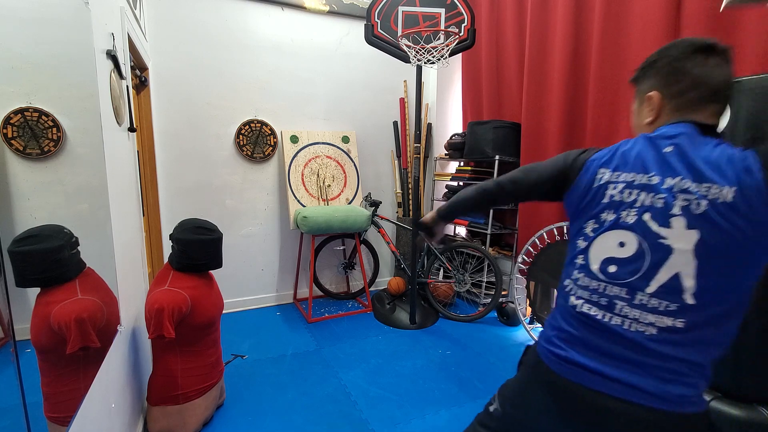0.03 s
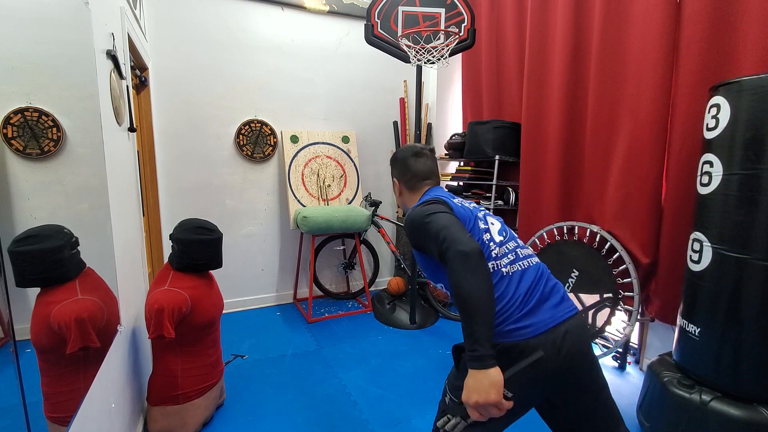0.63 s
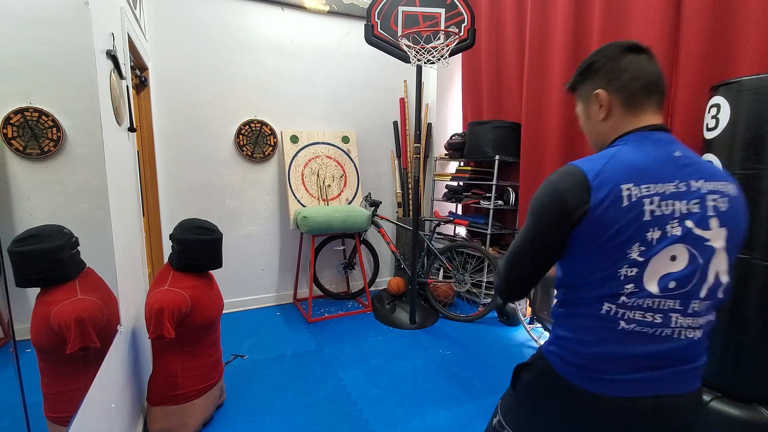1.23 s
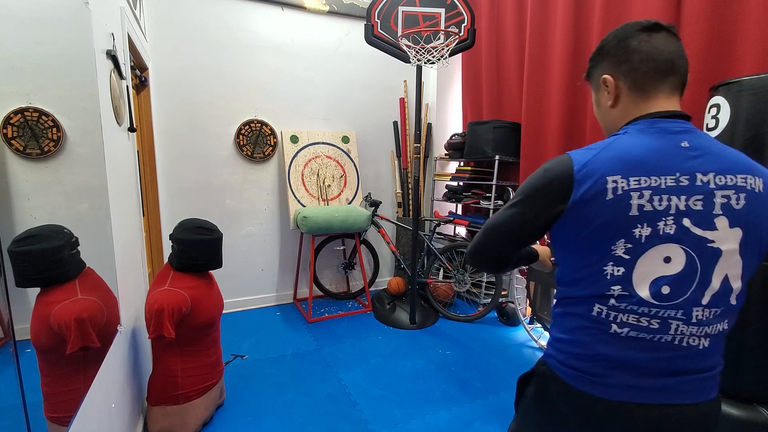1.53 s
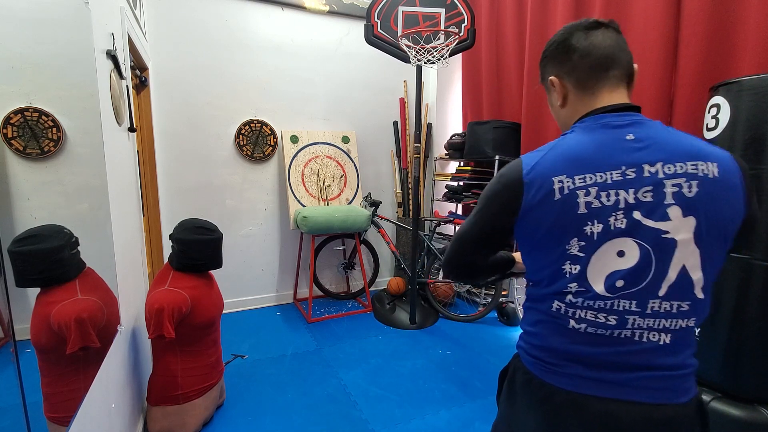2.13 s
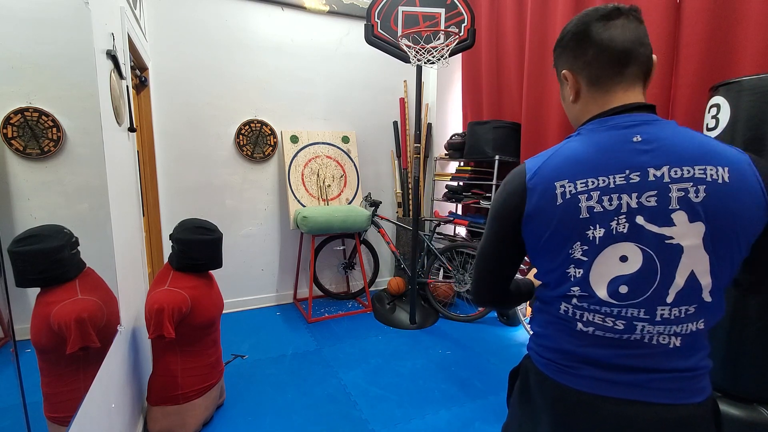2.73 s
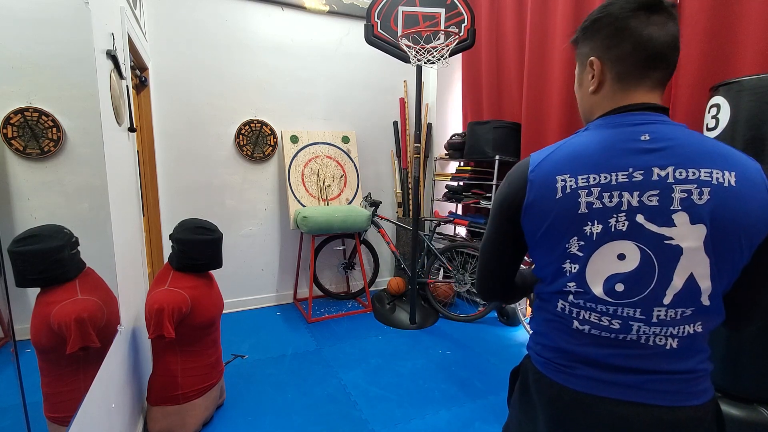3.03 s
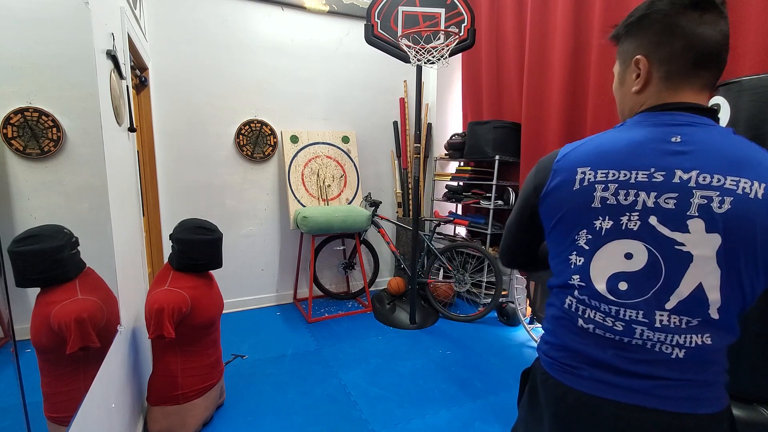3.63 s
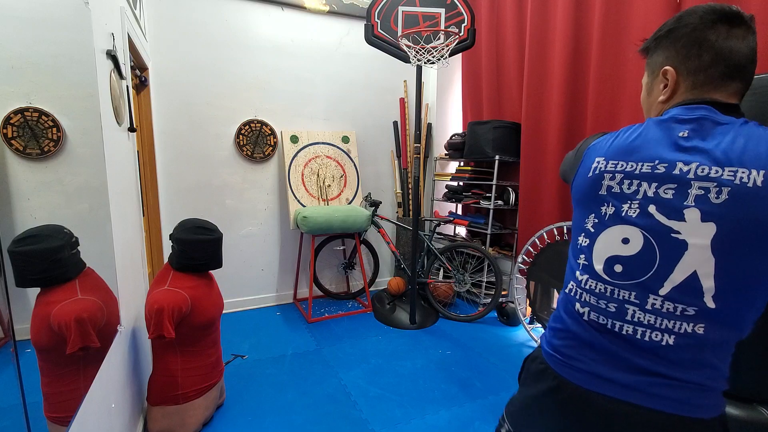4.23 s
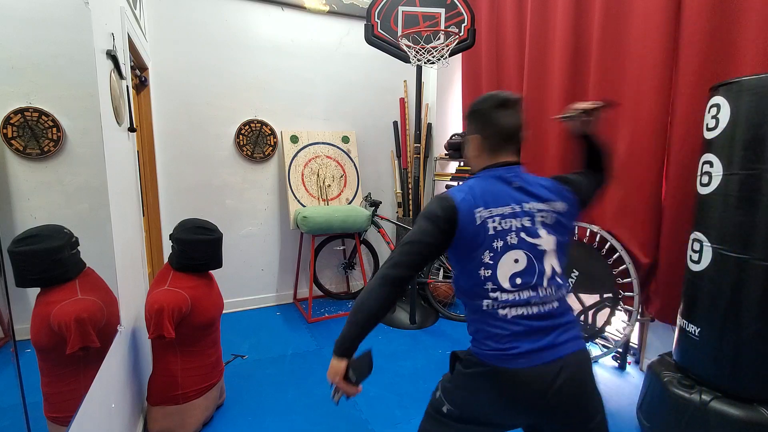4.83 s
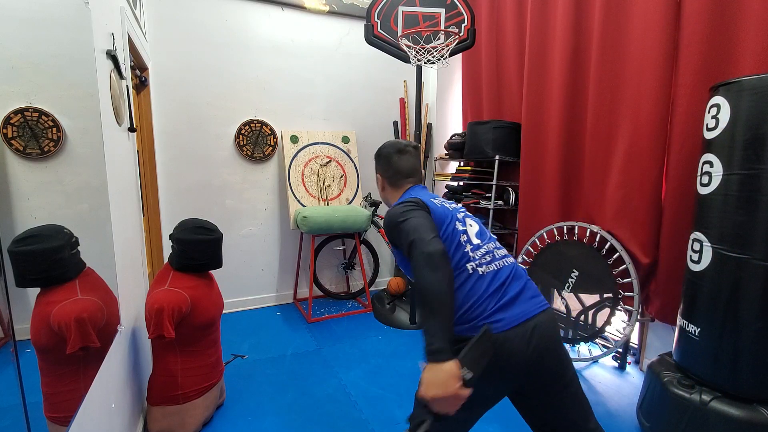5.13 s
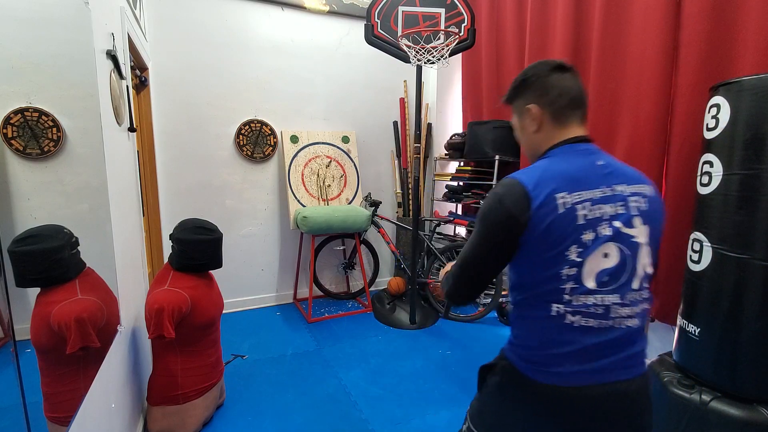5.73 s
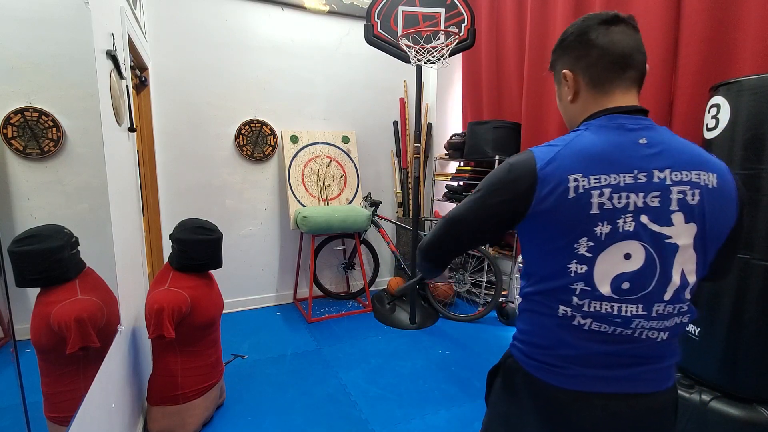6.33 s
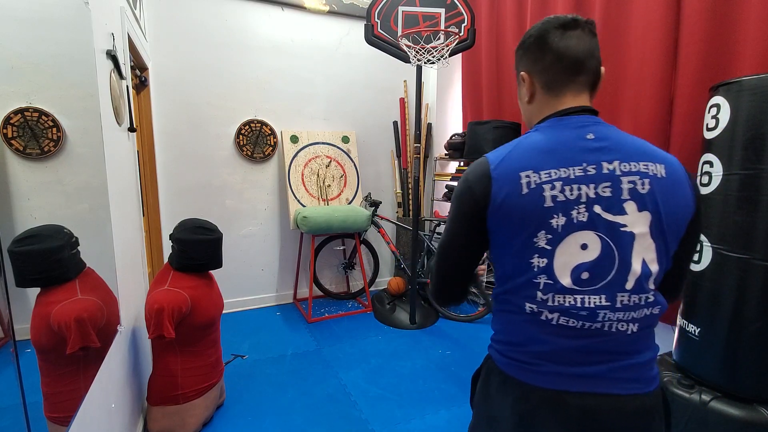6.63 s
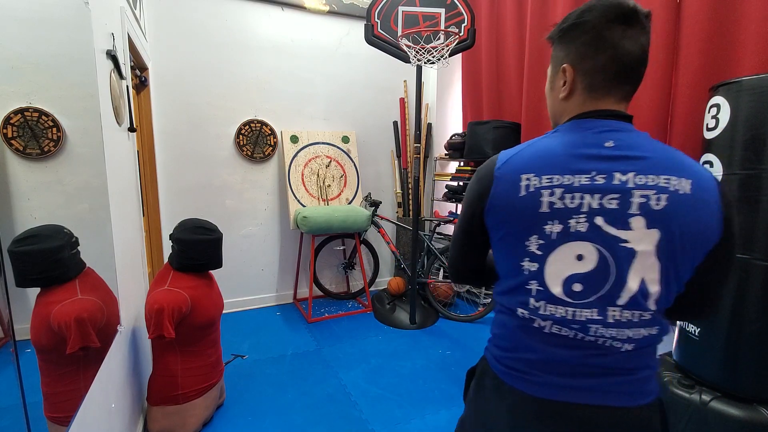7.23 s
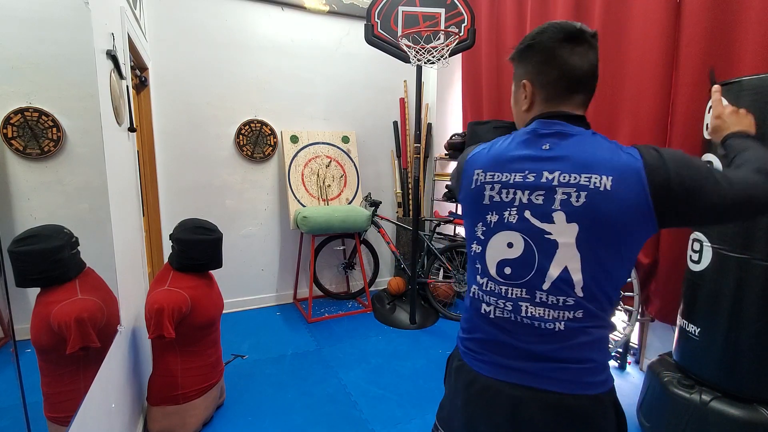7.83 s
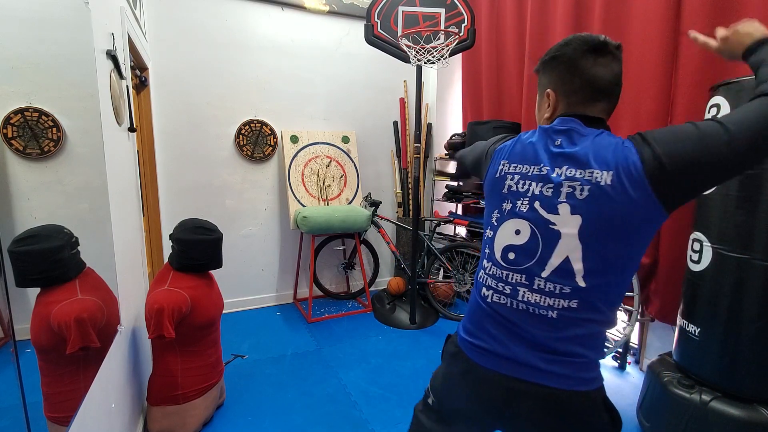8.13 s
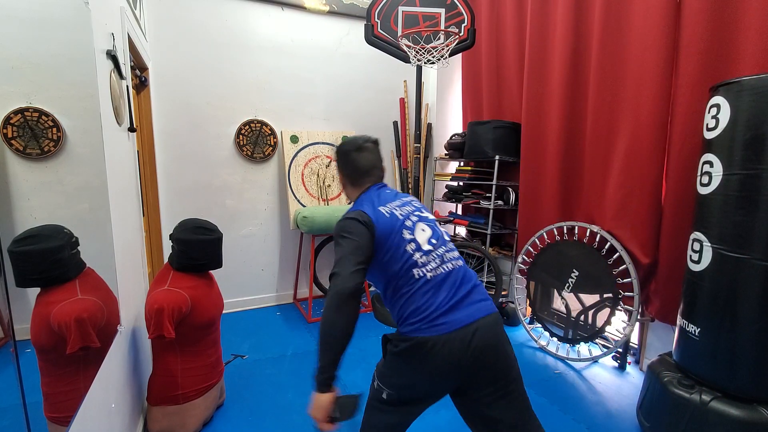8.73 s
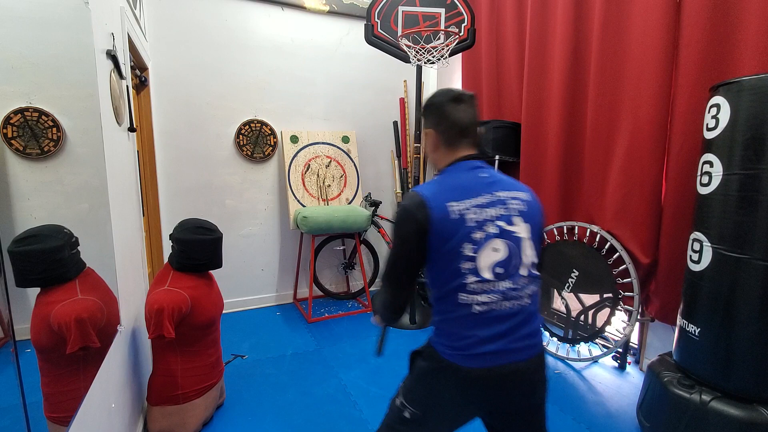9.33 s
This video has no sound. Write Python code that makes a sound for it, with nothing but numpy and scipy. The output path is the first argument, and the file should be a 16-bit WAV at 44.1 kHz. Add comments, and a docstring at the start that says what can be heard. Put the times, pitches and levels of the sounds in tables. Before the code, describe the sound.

Knives crack into a wooden board three times, each hit echoing briefly, amid faint steps, swishing clothes and a low room hum.

```python
"""A footfall, a sleeve's snap, then the crack and boom of a knife striking a wooden target board.
Three knives are thrown across a small training room: each blade splits the wood, the board booms
and the bare walls ring on. Between throws feet pat on foam mats, clothes swish and the spare knives
tick over a low room hum. Heard from inside the room, on a pair of microphones 17 cm apart."""
import sys
import numpy as np
from scipy import signal
from scipy.fft import rfft, irfft, next_fast_len
from scipy.io import wavfile
from scipy.ndimage import uniform_filter1d

SR = 44100
rng = np.random.default_rng(int(sys.argv[2]) if len(sys.argv) > 2 else 0)


def wav_out(sig):
    """Save sig, one row per channel (or a flat mono array), as 16-bit PCM at SR to the path in sys.argv[1]."""
    wavfile.write(sys.argv[1], SR, np.round(np.clip(np.atleast_2d(sig).T, -1, 1) * 32767).astype(np.int16))


N = 413658
TIME = np.arange(N) / SR
AGE = TIME[:SR]  # seconds since a blow

# knife hits and the trim on each of their layers:
# (time [s], boom [dB], knock [dB], clack [dB], splinter [dB], sizzle [dB], crack [dB])
THROWS = [(0.6377, -1.5, -1.5, 0, -6.5, -0.5, -8.5), (5.2134, -1, 1.5, -3.5, 2.5, 5.5, 2.5),
          (8.8976, -1.5, 1.5, 2.5, -8.5, 1.5, 1)]
# modes of the board on its stand; the spot a blade hits sets each one's share:
# (frequency [Hz], level in throw 1 [dB], in throw 2 [dB], in throw 3 [dB])
BOARD_MODES = [(141.3, -25, -22, -26.5), (176.9, -24, -21, -25.5), (229, -15.5, -23, -19),
               (254.5, -17.5, -19, -18), (281.6, -23.5, -24.5, -20.5), (307.3, -9, -13, -13),
               (332, -20, -25.5, -23), (351.3, -21.5, -28, -26), (406, -24, -23.5, -26),
               (439, -32, -28, -32), (609, -30, -23, -28), (683, -34.5, -30.5, -25),
               (743, -35.5, -26.5, -37), (803, -41, -24, -31), (842, -30.5, -35, -31),
               (946, -32.5, -28, -25), (1043, -23.5, -35.5, -35), (1098, -24.5, -29, -30),
               (1140, -30.5, -38.5, -16), (1180, -28, -30, -34), (1228, -32, -28, -24.5),
               (1300, -36.5, -30, -35), (1376, -34.5, -33.5, -27), (1494, -41, -39, -35),
               (2060, -38, -44, -43), (2290, -51.5, -38, -51), (3335, -65, -43.5, -48),
               (4690, -64.5, -47, -56)]
# dense ring of wood and room, in low, middle and high registers: (frequency [Hz], level [dB])
BOOM_COLOUR = [(40, -34.5), (85, -12.5), (140, -7), (240, -3.5), (360, -2.5), (460, -12.5), (700, -35.5)]
KNOCK_COLOUR = [(300, -20), (450, -4.5), (650, 0.5), (850, -1), (1200, -20)]
CLACK_COLOUR = [(650, -21.5), (950, -2), (1150, 3), (1380, -4), (1650, -12.5), (2200, -17.5), (2700, -24),
                (3300, -25), (3900, -37.5), (6000, -50.5)]
# splitting fibres, the crack and its two bright tails: (frequency [Hz], level [dB])
CRACK_COLOUR = [(1200, -10.5), (3000, 1), (4700, -7), (7500, -10), (10000, -5.5), (12000, -9), (14000, 1.5),
                (16000, 1)]
SPLINTER_COLOUR = [(2500, -12.5), (4500, -2), (5600, -6.5), (6800, -2), (8000, -9), (11000, -12),
                   (15000, -17)]
SIZZLE_COLOUR = [(7500, -18.5), (9500, -6.5), (12000, -7.5), (14000, 1), (16000, -0.5)]
# reverberation between the bare walls: (frequency [Hz], T60 [s])
ROOM_T60 = [(60, .7), (250, 0.57), (600, 0.38), (1200, 0.46), (2700, 0.43), (5000, .39), (9000, 0.38),
            (15000, 0.18)]
# feet on the mats: (time [s], level [dB], scuff trim [dB])
STEPS = [(0.2147, -31.5, -22), (.9415, -45, -14), (1.418, -48, -13), (1.546, -46.5, -28),
         (2.0647, -32.5, -40), (4.756, -31, -16.5), (5.176, -48.5, 4), (6.030, -47.5, -12.5),
         (6.135, -52, -15), (6.8496, -38.5, -5.5), (6.891, -36.5, -7), (7.346, -51.5, -5),
         (7.436, -46.5, -5), (8.470, -31.5, -19), (9.324, -35.5, -14.5)]
# weight settling on the floor: (time [s], level [dB], pitch [Hz])
TREADS = [(4.969, -42.5, 126), (7.544, -37.5, 140), (7.594, -35, 116.6), (7.716, -47, 130),
          (8.477, -37, 272)]
# the throwing arm: (swing start [s], sleeve snap time [s], snap length [s], snap level [dB])
SWINGS = [(0.193, 0.427, .042, -49.5), (4.754, 4.998, 0.021, -48.5), (8.457, 8.713, 0.033, -49)]
# sleeves and trousers between throws: (time [s], length [s], level [dB])
SWISHES = [(.85, .2, -70.5), (1.14, 0.062, -66.5), (1.418, 0.038, -60.5), (1.91, 0.25, -69),
           (2.38, 0.061, -77.5), (2.72, 0.072, -78), (2.86, 0.082, -76.5), (3.37, 0.052, -82),
           (3.855, 0.092, -69), (5.105, 0.013, -59.5), (5.455, .03, -67), (5.55, 0.14, -75),
           (5.67, 0.04, -64.5), (5.8, .025, -63), (6.03, 0.055, -61), (6.2, 0.047, -66.5),
           (6.6, 0.161, -79.5), (6.76, 0.038, -64), (6.85, 0.2, -59.5), (7.15, 0.043, -66),
           (7.35, 0.16, -68), (7.545, 0.065, -61), (7.605, 0.078, -54)]
# spectrum of rubbing cloth: (frequency [Hz], level [dB])
CLOTH_COLOUR = [(150, 4), (400, 9.5), (750, 2), (1300, -2), (2500, -6), (4000, -6.5), (6500, -6.5),
                (8500, -8), (11000, -5), (14500, -2.5), (16000, 1.5)]
# spare knives touching: (time [s], level [dB], centre [Hz], T60 [s], skirt an octave away [dB])
TICKS = [(.797, -67, 5040, 0.31, -300), (3.359, -72.5, 1138, 0.32, -200), (3.58, -76, 6740, 0.34, -200),
         (3.971, -74.5, 5800, .35, -81), (4.02, -58.5, 1204, 0.42, -19), (6.605, -78.5, 3920, 0.4, -160),
         (6.787, -54.5, 3500, 0.032, -1), (7.335, -70, 6170, 0.41, -72), (7.423, -47, 9030, 0.018, 1)]
# soft rubs, and one faint low tone:
# (peak time [s], level [dB], half length [s], centre [Hz], skirt an octave away [dB])
RUBS = [(.47, -63.5, 0.066, 700, -2.5), (1.965, -69, 0.076, 3330, -1.5), (1.998, -64.5, 0.068, 646, -3.5),
        (3.122, -72.5, 0.065, 1400, -11.5), (6.08, -63, 0.016, 2780, -12), (6.24, -61.5, 0.13, 371, -93.5),
        (7.017, -56.5, 0.073, 2680, -9), (7.678, -54.5, 0.042, 700, -8.5)]
# level of the low rumble as heard; it ducks after the first two hits and slowly recovers:
# three runs of (time [s], level [dB])
HEARD_RUMBLE_LEVELS = [
    [(0.0, -54), (0.152, -47), (0.5, -49)],
    [(1.15, -58.5), (1.96, -58.5), (2.4, -54), (2.63, -54.5), (4.49, -51.5), (4.9, -49)],
    [(5.75, -57.5), (6.42, -56.5), (7.15, -51.5), (7.77, -46.5), (8.44, -53.5), (8.6, -50.5)],
]
# room tone, low drone and faint hiss: (frequency [Hz], level [dB])
DRONE_COLOUR = [(35, -18.5), (50, -0.5), (68, -3), (92, 4.5), (125, -8), (165, -12), (230, -17), (330, -19),
                (450, -36), (700, -47), (1200, -53)]
HISS_COLOUR = [(400, -5), (900, -10.5), (1300, 4.5), (1850, 8), (2700, -4.5), (5000, -15.5), (6600, -4),
               (8000, -20), (12000, -13.5), (15000, -6)]
# how much more the left microphone hears: (frequency [Hz], left over right [dB])
LEFT_BIAS = [(60, 0), (125, 1), (250, 3), (500, 1.5), (1000, 2.5), (2000, 4.5), (4000, 3.5), (8000, 3),
             (11000, -1), (14500, 6.5)]

MIC_GAP_M, SOUND_M_PER_S = .17, 343


def knife(throw, boom_db, knock_db, clack_db, splinter_db, sizzle_db, crack_db):
    """The point splits the fibres, then the stopping blade drives the board and the room."""
    crack = noise(CRACK_COLOUR) * swell(.0006) * fade(.059) * undb(crack_db - 21.5)
    # the board bends away and draws air in, then slaps it out as the blade stops
    bend = -.5 * ring(225, t60=.04) * swell(.00083)
    slap = .16 * np.exp(-((AGE - .0032) / .00032) ** 2)
    boom = undb(boom_db - 17.5) * reverberate(BOOM_COLOUR)
    knock = undb(knock_db - 16.5) * reverberate(KNOCK_COLOUR)
    clack = undb(clack_db - 15.5) * reverberate(CLACK_COLOUR)
    splinter = undb(splinter_db - 40) * reverberate(SPLINTER_COLOUR)
    sizzle = undb(sizzle_db - 33) * reverberate(SIZZLE_COLOUR)
    wood = (boom + knock + clack) * swell(.0034)
    fibres = (splinter + sizzle) * swell(.0012)
    return crack + bend + slap + board(throw) + wood + fibres


def board(throw):
    """The board's modes each reach the pair from their own direction, the high ones off the walls."""
    hz, *share_db = np.transpose(BOARD_MODES)
    direction, path = rng.uniform(-1, 1, (len(hz), 2)).T
    mic_phase = np.pi * hz * MIC_GAP_M / SOUND_M_PER_S * direction
    path_phase = np.pi * np.minimum(hz / 600, 1) * path
    phases = (path_phase + np.array([mic_phase, -mic_phase])).T[:, :, None]
    t60s = .49 * (hz / 300) ** -.16  # wood damps high modes sooner
    modes = zip(hz, t60s, share_db[throw], phases)
    return -sum(undb(db + .5) * ring(f, t60, phase) for f, t60, db, phase in modes) * swell(.004453)


def reverberate(colour):
    """The room's answer to a blow: every band dies at its own rate."""
    spectrum, hz = rfft(noise(colour)), np.fft.rfftfreq(SR, 1 / SR)
    centres, t60s = np.transpose(ROOM_T60)
    bands = [np.interp(np.log(hz + 1), np.log(centres), row) for row in np.eye(len(centres))]
    return sum(irfft(spectrum * band, SR) * fade(t60) for band, t60 in zip(bands, t60s))


def step(scuff_db, pat_hz=567):
    """A sole slaps the foam and traps air: a click, a hollow pat, a scuff, and then the walls."""
    click = undb(8.5) * noise(hump(670, skirt_db=-8)) * fade(.0072) * swell(.003)
    pat = 2.73 * ring(pat_hz, t60=.01) * swell(.0008)
    walls = undb(-10.5) * reverberate(hump(pat_hz, skirt_db=-15.5)) * swell(.0059)
    scuff = undb(scuff_db - 5.5) * noise(CLOTH_COLOUR) * fade(.17) * swell(.0011)
    return click + pat + walls + scuff


def tread(hz):
    """Weight settles on the floor with a low thud."""
    return ring(hz, t60=.152) * swell(.0054)


def sleeve(tilt_db_per_octave=1.36):
    """The sleeve snaps taut as the knife leaves the hand, quicker and brighter than a swish."""
    colour = [(hz, db + tilt_db_per_octave * np.log2(hz)) for hz, db in CLOTH_COLOUR]
    snaps = sum(movement(s, length_s, db, attack_s=.006) for _, s, length_s, db in SWINGS)
    return undb(2.5) * fabric(colour) * snaps


def clothes(wind_up_s=.65, wind_up_db=-76.5, swing_db=-63):
    """Cloth as loud as the body moves fast: swishes, each wind-up and forward swing, and fidgeting."""
    moves = list(SWISHES)
    for s, snap_s, _, _ in SWINGS:
        moves += [(s - wind_up_s, wind_up_s, wind_up_db), (s, snap_s - s, swing_db)]
    power = sum(movement(s, length_s, db, attack_s=.13 * length_s) ** 2 for s, length_s, db in moves)
    fidget = undb(-83.5 + 2 * wander(per_s=5.9))  # the body is never quite still
    return undb(5.5) * np.sqrt(power + fidget ** 2) * fabric(CLOTH_COLOUR)


def movement(s, length_s, db, attack_s, t60=.4):
    """Level of one movement of cloth: it rises, holds while the limb moves and dies with the room."""
    rise = 1 - np.exp(-np.maximum(TIME - s, 0) / attack_s)
    decay_db = 60 * np.maximum(TIME - s - length_s, 0) / t60
    return undb(db - decay_db) * rise


def fabric(colour):
    """Cloth rubs in countless tiny slips, bunched by its folds."""
    slips = uniform_filter1d(rng.standard_normal(N), size=40)
    slips_db = slips / slips.std()
    folds_db = 1.57 * wander(per_s=25)
    return undb(slips_db + folds_db) * long_noise(colour)


def tick(hz, t60, skirt_db):
    """Spare knives touch in the hand: steep skirts give a clean ring, flat ones a dry clack."""
    return noise(hump(hz, skirt_db)) * fade(t60) * swell(.00117)


def rub(half_s, hz, skirt_db):
    """A sole, hand or blade slides softly, swelling to a peak half a second in."""
    return noise(hump(hz, skirt_db)) * np.exp(-((AGE - .5) / half_s) ** 2 / 2)


def rumble(mains_hz=59.2, surge_t60_s=2.2):
    """The building drones, with a wavering mains hum and a deep surge that dies away at the start."""
    heard_level = undb(np.interp(TIME, *np.vstack(HEARD_RUMBLE_LEVELS).T))
    drone = long_noise(DRONE_COLOUR)
    hum = undb(1 + 3 * wander(per_s=6)) * np.sqrt(2) * np.sin(2 * np.pi * mains_hz * TIME)
    surge = undb(-36.5 - 60 * TIME / surge_t60_s)
    deep = (undb(-11) * heard_level + surge) * long_noise(hump(35, skirt_db=-35.5))
    return heard_level * (drone + hum) + deep


def hiss(left_db=9.5):
    """A faint steady hiss, louder in the left microphone."""
    balance = undb(np.array([[left_db], [-left_db]]) / 2)
    return undb(-78.5) * long_noise(HISS_COLOUR) * balance


def noise(colour, size=SR):
    """Diffuse sound of rms 1 at the pair: long waves reach both microphones alike, short ones do not."""
    hz = np.fft.rfftfreq(size, 1 / SR)
    alike = np.sinc(2 * hz * MIC_GAP_M / SOUND_M_PER_S)
    mid, side = rfft(rng.standard_normal((2, size)))
    mid, side = mid * np.sqrt(1 + alike), side * np.sqrt(1 - alike)
    # outside its points the spectrum falls away steeply
    ends = 1 / (1 + (colour[0][0] / (hz + 1)) ** 4) / (1 + (hz / colour[-1][0] / 2) ** 4)
    pair = irfft(np.array([mid + side, mid - side]) * undb(lookup(colour, hz)) * ends, size)
    return pair / pair.std()


def long_noise(colour):
    """Diffuse sound for the whole scene."""
    return noise(colour, size=next_fast_len(N))[:, :N]


def hump(hz, skirt_db):
    """Spectrum of one resonance, at skirt_db an octave either side."""
    return [(hz * 2. ** octave, skirt_db * abs(octave) ** 1.5) for octave in np.linspace(-2, 2, 9)]


def ring(hz, t60, phase=0):
    """One struck mode."""
    return np.sin(2 * np.pi * hz * AGE + phase) * fade(t60)


def fade(t60):
    """Exponential decay after a blow, 60 dB in t60 seconds."""
    return np.exp(-np.log(1000) * AGE / t60)


def swell(rise_s):
    """Smooth rise after a blow."""
    return 1 - np.exp(-(AGE / rise_s) ** 2)


def wander(per_s):
    """A random drift with a spread near 1."""
    knots = np.arange(0, TIME[-1] + 1, 1 / per_s)
    return 1.2 * np.interp(TIME, knots, rng.standard_normal(SR)[:len(knots)])


def undb(db):
    """Decibels to gain."""
    return 10 ** (np.asarray(db) / 20)


def lookup(points, hz):
    """Read (frequency, value) points on a log-frequency axis."""
    point_hz, value = np.transpose(points)
    return np.interp(np.log(hz + 1e-6), np.log(point_hz), value)


def add(out, s, sound):
    """Mix a sound in at time s."""
    start = max(int(s * SR), 0)
    out[:, start:start + sound.shape[-1]] += sound[..., :N - start]


def scene():
    """Throws, footwork and clothing over the training room's hum and a faint hiss."""
    out = clothes() + sleeve()
    for throw, (s, *trims_db) in enumerate(THROWS):
        add(out, s, knife(throw, *trims_db))
    for s, db, scuff_db in STEPS:
        add(out, s, undb(db) * step(scuff_db))
    for s, db, hz in TREADS:
        add(out, s, undb(db) * tread(hz))
    for s, db, hz, t60, skirt_db in TICKS:
        add(out, s, undb(db) * tick(hz, t60, skirt_db))
    for s, db, half_s, hz, skirt_db in RUBS:
        add(out, s - .5, undb(db) * rub(half_s, hz, skirt_db))
    return out + rumble() + hiss()


def record(dry, low_cut_hz=33, top_hz=15850):
    """The two microphones colour the room differently, lose deep bass, round peaks and cut the top."""
    size = next_fast_len(N + SR)
    left_db = lookup(LEFT_BIAS, np.fft.rfftfreq(size, 1 / SR))
    balance = undb(np.array([left_db, -left_db]) / 2)
    heard = irfft(rfft(dry, size) * balance, size)[:, :N]
    heard = signal.sosfilt(signal.butter(2, low_cut_hz, "high", fs=SR, output="sos"), heard)
    rounded = heard / (1 + heard ** 6) ** (1 / 6)
    return signal.sosfilt(signal.ellip(10, .2, 70, top_hz, fs=SR, output="sos"), rounded)


dry = scene()
out = record(dry)
wav_out(out)
```